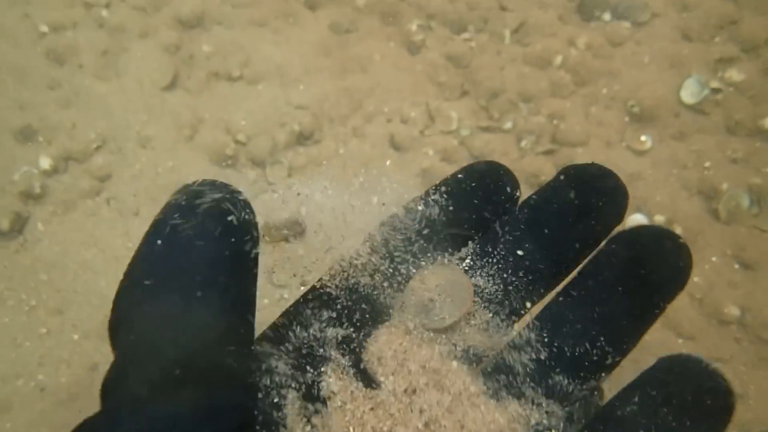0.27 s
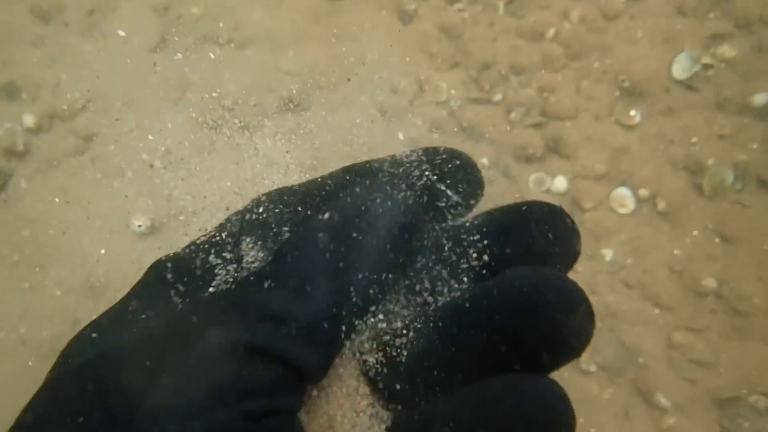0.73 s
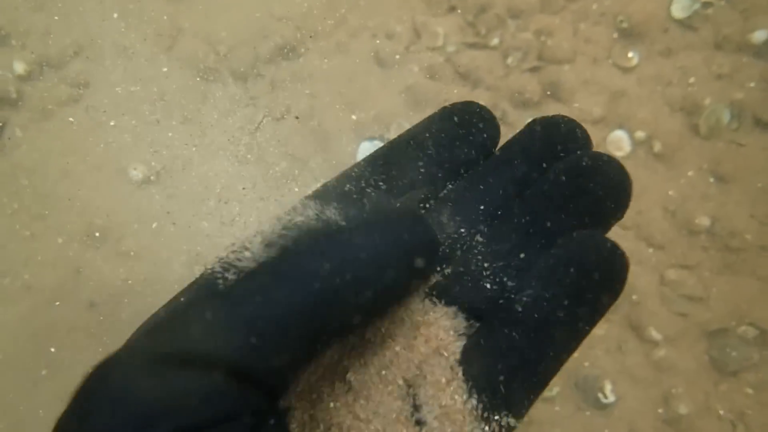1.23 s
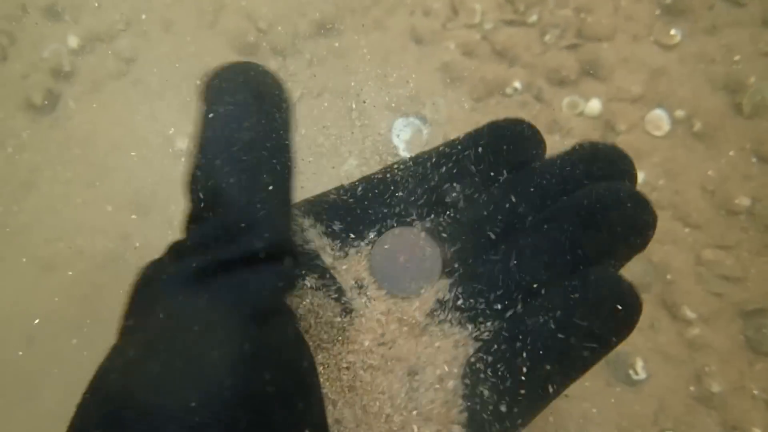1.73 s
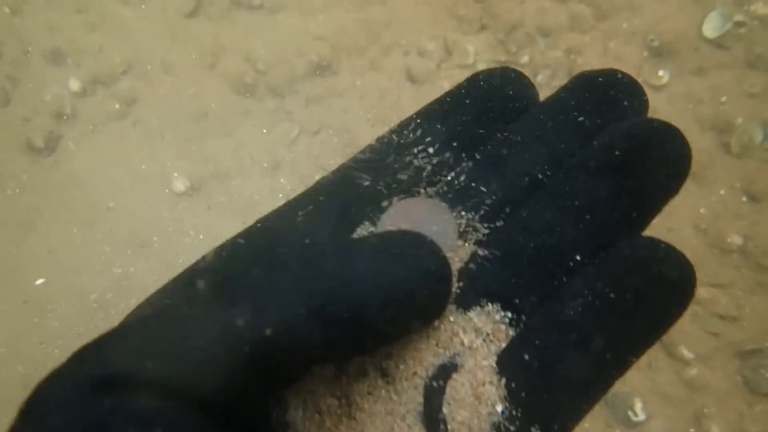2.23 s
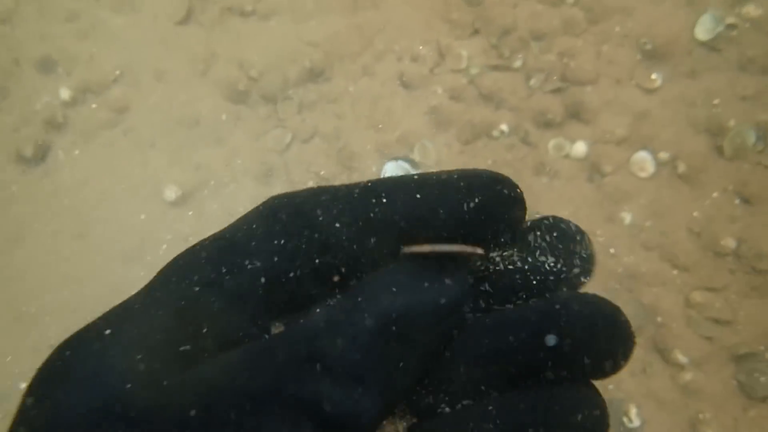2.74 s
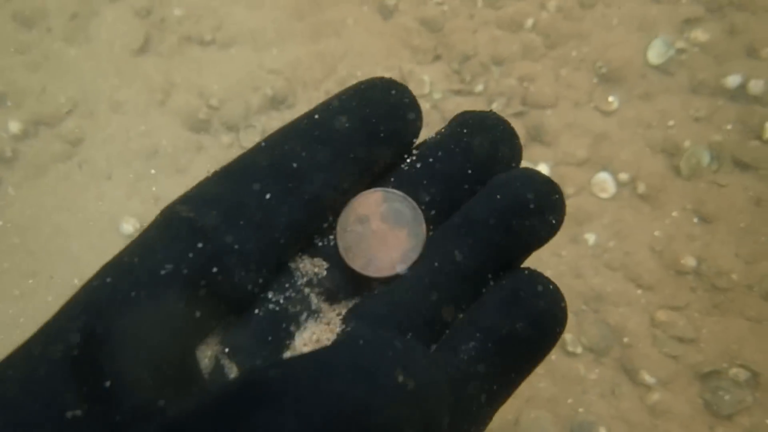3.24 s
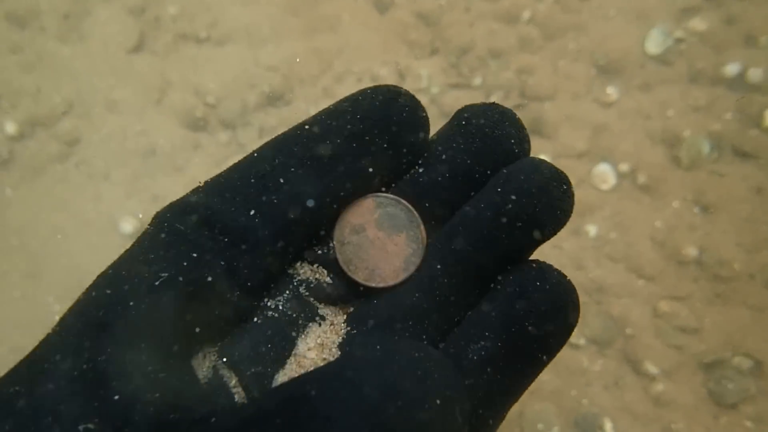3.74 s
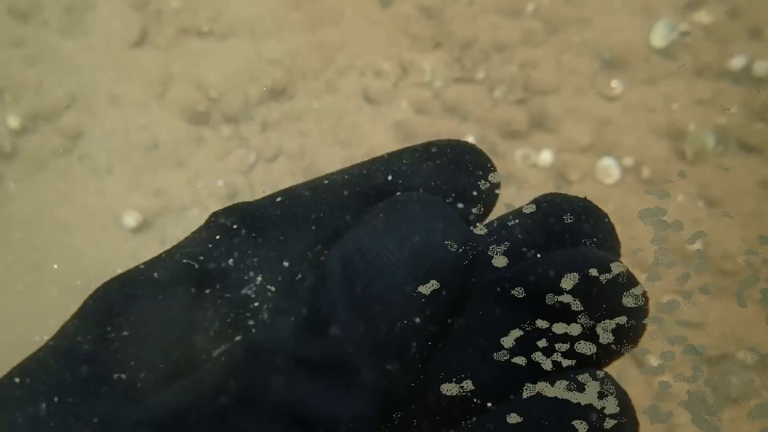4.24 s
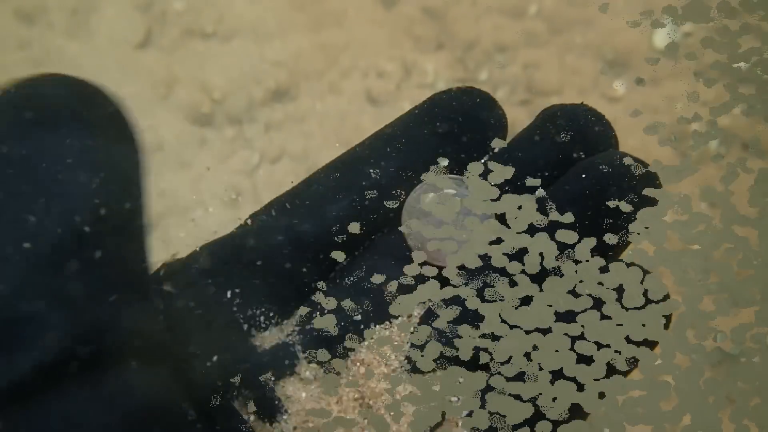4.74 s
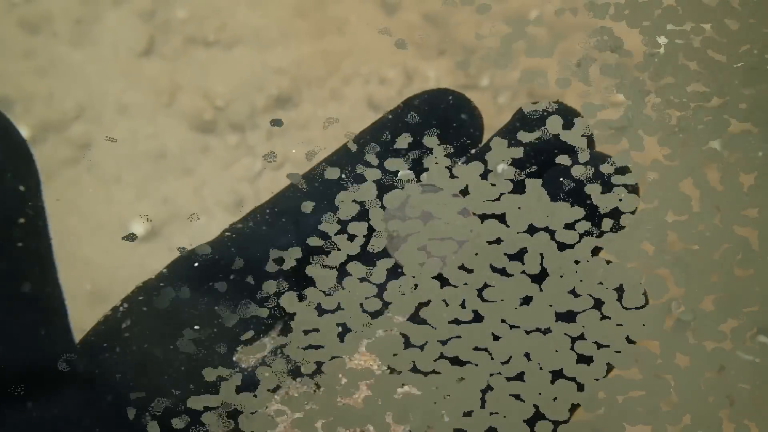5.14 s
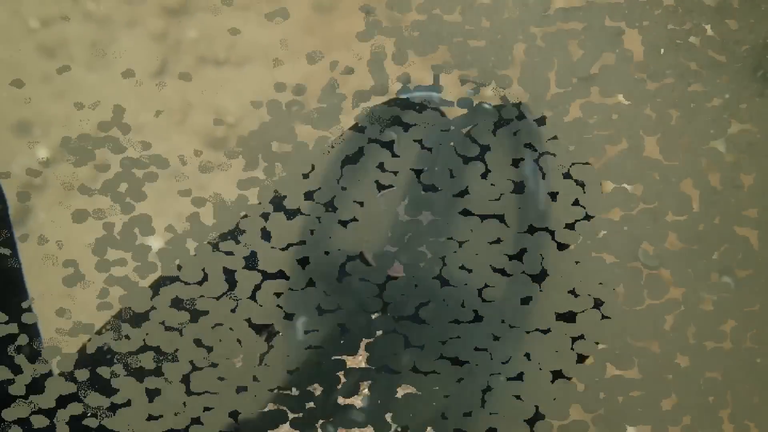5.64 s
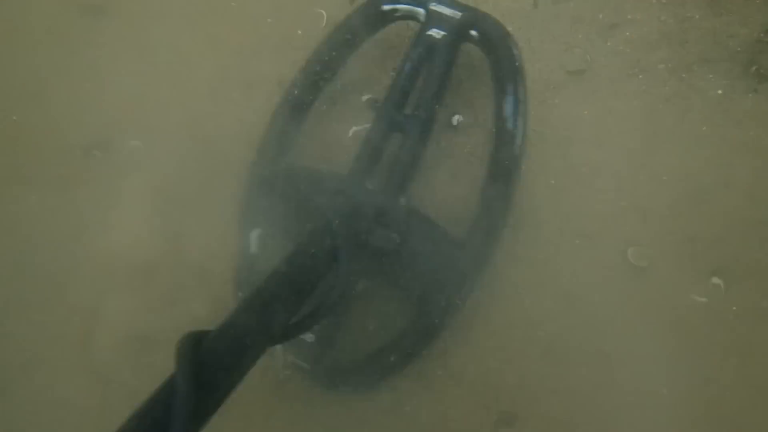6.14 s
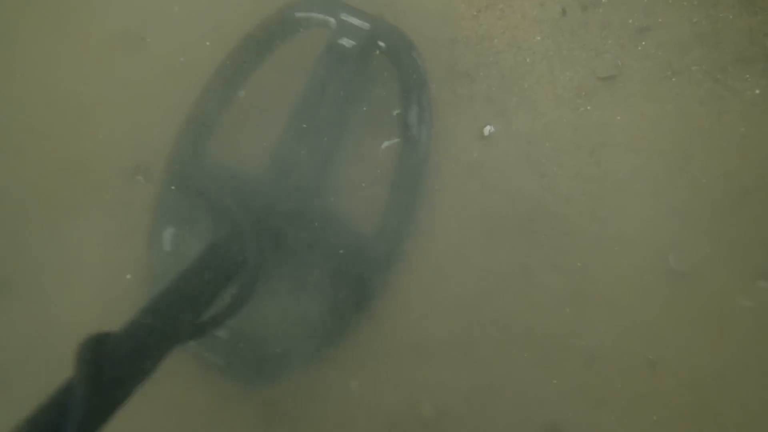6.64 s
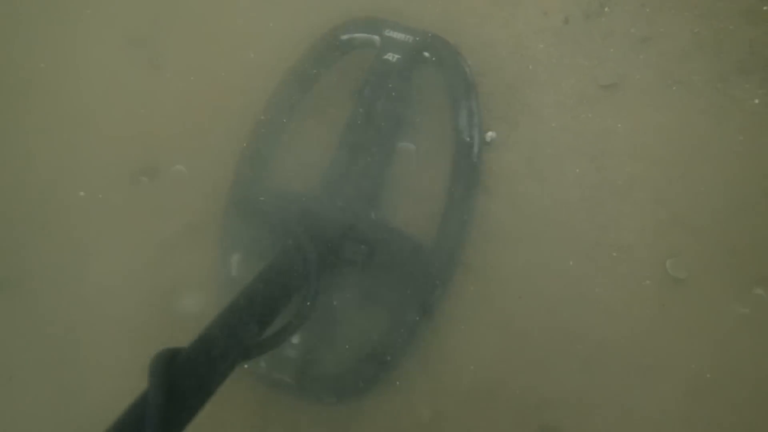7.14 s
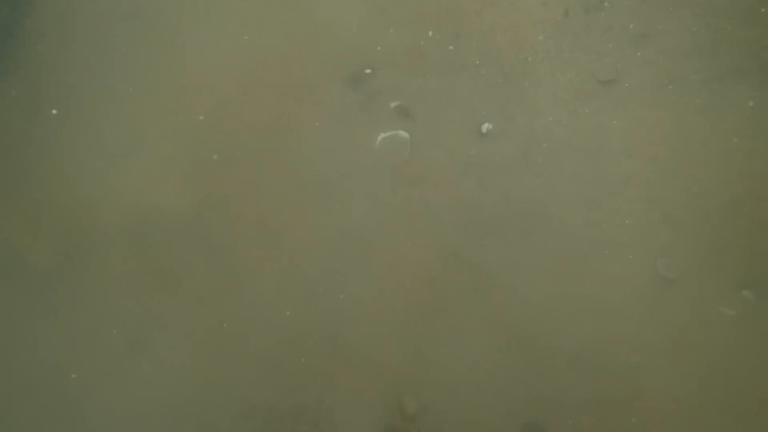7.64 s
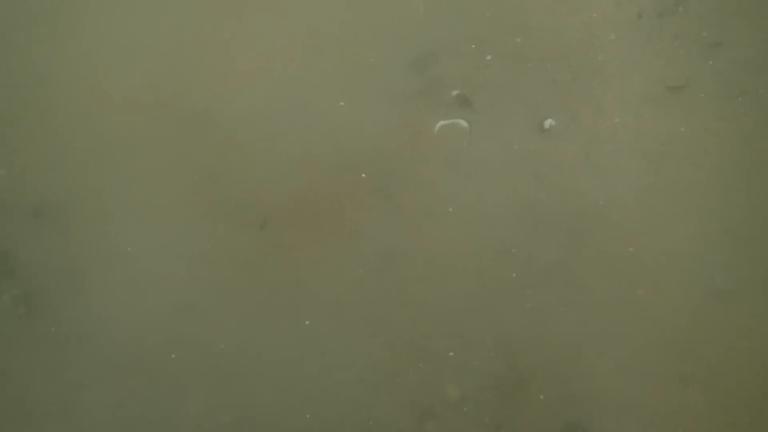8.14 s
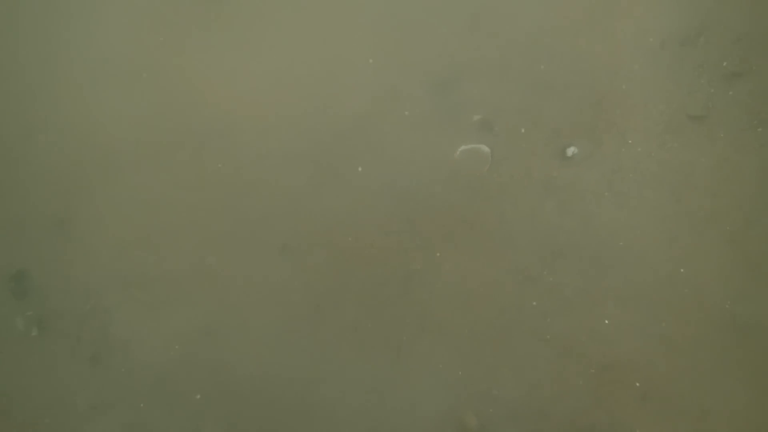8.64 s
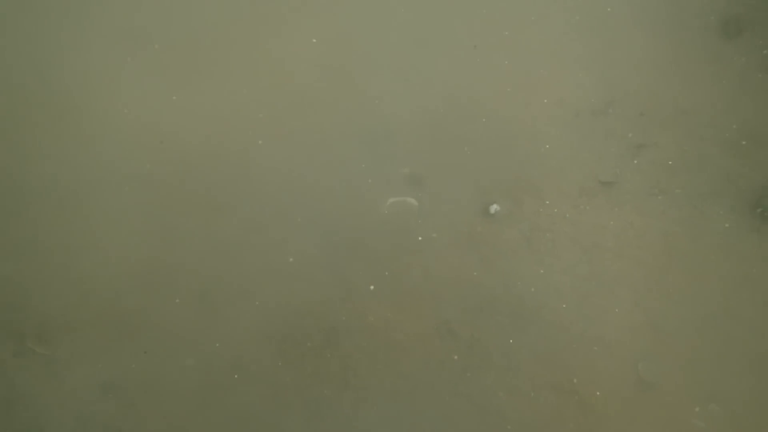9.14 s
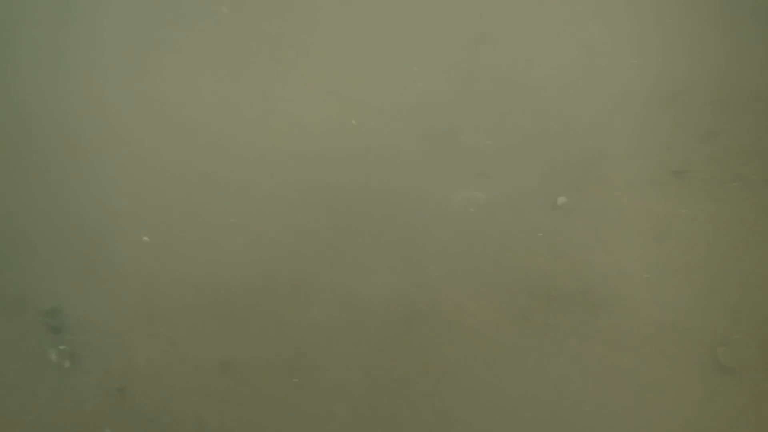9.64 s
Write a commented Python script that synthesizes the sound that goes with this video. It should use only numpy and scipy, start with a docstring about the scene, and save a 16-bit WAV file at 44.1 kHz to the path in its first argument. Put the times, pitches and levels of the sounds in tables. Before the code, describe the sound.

Close and muffled inside a sealed underwater camera housing, a gloved hand rubs sand off a coin: short gritty rasps, clicks and dull hollow knocks over a rough electronic purr. A lull follows around three seconds, then a few hard buzzing snaps and thumps. As the diver moves on, low watery wash and thin regular ticks take over, ending in bubbly sand scrapes and clustered knocks.

```python
"""A gloved hand rubs sand off a coin beside a sealed underwater camera, then the diver moves on over the bed.
Sand rasps as shaped random grains, coarse grains crunch, grit clicks, and the housing knocks as a damped resonator.
Bubbles ring as short rising tones; river noise rumbles and hollow rings gurgle round the housing.
Electronics purr in bursts repeated every picture, later with thin ticks, over a faint filtered hiss.
A peak limiter lowers the whole sound on hard knocks."""
import sys
import numpy as np
from scipy import signal
from scipy.fft import rfft, irfft, next_fast_len
from scipy.io import wavfile
from scipy.ndimage import uniform_filter1d, minimum_filter1d, map_coordinates

SR = 44100
rng = np.random.default_rng(int(sys.argv[2]) if len(sys.argv) > 2 else 0)


def wav_record(signal):
    """Record a signal, one row per channel, as 16-bit PCM in the file named by sys.argv[1]."""
    frames = np.transpose(np.atleast_2d(signal))
    bounded = np.clip(frames, -1, 1)
    # unit amplitude maps onto the largest positive 16-bit level
    quanta = np.round(bounded * 32767).astype(np.int16)
    wavfile.write(sys.argv[1], SR, quanta)


N = 436149
TIME = np.arange(N) / SR
RING = np.arange(SR // 10) / SR  # time axis of one short sound
PICTURE_S = 1001 / 15000  # the camera's picture period


def amp(db):
    """Logarithmic level: decibels to linear gain."""
    return 10 ** (np.asarray(db) / 20)


def unit(x):
    """Normalisation of mean power: scale to rms 1."""
    return x / np.sqrt(np.mean(x ** 2) + 1e-20)


def curves(rows, at=TIME):
    """Linear interpolation in time of each column after the first."""
    s, *columns = np.transpose(rows)
    return [np.interp(at, s, column) for column in columns]


def wobble(rate, size=N):
    """Band-limited random modulation: a smooth curve through rate random knots a second."""
    position = np.arange(size) * rate / SR
    steps = np.arange(0, position[-1] + 1, 1 / 8)
    knots = rng.standard_normal(int(position[-1]) + 4)
    return np.interp(position, steps, map_coordinates(knots, [steps]))


def response(points, size=16384):
    """Minimum phase: the causal impulse response with the gain of (Hz, dB) points."""
    f, db = np.transpose(points)
    log_f = np.log(np.fft.rfftfreq(size, 1 / SR) + 1)
    cepstrum = irfft(np.log(amp(np.interp(log_f, np.log(f), db))))
    # folding the cepstrum forward in time makes the response causal
    cepstrum[1:size // 2] *= 2
    cepstrum[size // 2 + 1:] = 0
    return irfft(np.exp(rfft(cepstrum)))


def colour(x, points):
    """Linear filtering: shape each channel with a spectrum."""
    return signal.oaconvolve(x, response(points)[None], axes=1)[:, :N]


def struck(impulses, points):
    """Impulse excitation: each impulse becomes a click of the same peak with the given spectrum."""
    click = response(points)
    return signal.oaconvolve(impulses, click / np.abs(click).max())[:N]


def add(track, s, sound):
    """Superposition: mix a sound in at time s."""
    i = int(round(s * SR))
    if 0 <= i < N:
        track[..., i:i + sound.shape[-1]] += sound[..., :N - i]


def pan(left_db):
    """Level difference between ears: gains of the two microphones, left_db apart."""
    return amp([[left_db / 2], [-left_db / 2]])


def spread(mid, side, side_db):
    """Partial coherence: a stereo pair of rms 1 from two unrelated signals."""
    return unit(unit(mid) + amp(side_db) * unit(side) * np.array([[1], [-1]]))


def grit(rate, scatter_db):
    """Shot noise: random impulses of uneven size, on average rate a second."""
    size = amp(scatter_db * np.clip(rng.standard_normal(N), -2, 2))
    hits = rng.random(N) < rate / SR
    return unit(hits * rng.uniform(-1.13, 1, N) * size)


def blips(rate, pitch_hz, octaves, cycles, scatter_db):
    """Damped oscillation: a stream of short rings at scattered pitches."""
    count = int(rate * N / SR)
    start, pitch, size, sign = np.clip(rng.standard_normal((count, 4)), -2, 2).T
    start = np.abs((np.arange(count) + start) * SR / rate).astype(int)
    t = RING[:len(RING) // 2]
    turns = pitch_hz * 2 ** (octaves * pitch[:, None]) * t
    gain = (np.sign(sign) * amp(scatter_db * size))[:, None]
    envelope = (1 - np.exp(-2 * turns)) * np.exp(-turns / cycles)
    rings = gain * np.sin(2 * np.pi * turns) * envelope
    places = start[:, None] + np.arange(len(t))
    return unit(np.bincount(places.ravel(), rings.ravel(), N)[:N])


def swell(start, end, rise, fall, db, at=TIME):
    """Exponential onset and decay: holds start to end, 20 dB down a rise before and a fall after."""
    outside = np.maximum(start - at, 0) / rise + np.maximum(at - end, 0) / fall
    return amp(db - 20 * np.minimum(outside, 10))


def swells(rows):
    """Energy summation: the joint gain of (crest s, rise s, fall s, dB) swells, added in power."""
    coarse = np.linspace(0, N / SR, 4000)
    power = sum(swell(s, s, rise, fall, db, coarse) ** 2 for s, rise, fall, db in rows)
    return np.interp(TIME, coarse, np.sqrt(power))


# strokes that rub sand in the glove or stir it on the bed: crest_s [s], rise_s [s], fall_s [s], level_db [dB]
SAND_STROKES = [(.065, 0.17, 0.11, -36.5), (.65, 0.11, 0.11, -33.5), (.855, 0.12, 0.13, -34.5),
                (1.385, 0.075, 0.23, -43), (1.53, 0.22, 0.11, -43), (1.615, 0.064, 0.05, -25.5),
                (1.725, 0.079, 0.052, -42.5), (2.46, 0.18, 0.44, -49.5), (2.6, 0.27, 0.24, -46.5),
                (4.13, 0.067, 0.021, -47), (4.275, 0.064, 0.058, -40.5), (4.46, 0.13, 0.13, -46.5),
                (4.77, 0.025, 0.071, -45), (5.95, 0.23, 0.16, -50.5), (7.04, 0.028, 0.048, -42.5),
                (7.115, 0.15, 0.075, -44.5), (7.3, 0.024, 0.04, -37.5), (7.985, 0.077, 0.28, -37),
                (8.2, 0.091, 0.11, -48), (8.35, 0.036, 0.16, -43), (8.51, 0.07, 0.11, -39),
                (8.68, 0.042, 0.06, -43.5), (8.89, 0.11, .09, -49), (9.39, 0.11, 0.057, -44.5),
                (9.67, 0.38, 0.54, -46)]
# spectrum of the rasping grains: frequency_hz [Hz], level_db [dB per Hz]
RASP_SPECTRUM = [(500, -23.5), (900, 22.5), (1300, 15), (1650, 16), (1950, 2), (2400, -0.5), (3100, -8),
                 (3700, -23.5), (6000, -34), (9000, -48.5), (14000, -56)]
# fine sand pouring: centre_s [s], length_s [s, Gaussian width], level_db [dB]
SAND_POURS = [(0.647, 0.032, -48), (0.863, 0.034, -59.5), (1.61, 0.017, -61), (5.92, 0.056, -56),
              (6.655, 0.02, -62), (7.033, 0.027, -56.5), (7.3, 0.015, -52.5), (9.37, 0.03, -56.5)]
# spectrum of fine sand: frequency_hz [Hz], level_db [dB per Hz]
FINE_SAND_SPECTRUM = [(1200, -17), (2200, 7), (3100, 3), (4000, -6), (5500, 5.5), (6800, 2), (8500, -4),
                      (12000, -30)]
DRIFT_DB = -59  # sand that drifts between the strokes
FROTH_DB = -1  # tiny bubbles against the grains, at full froth


def sand():
    """Granular friction: grains rasp under glove and search coil, the stirred bed froths, fine sand fizzes."""
    frothing = np.interp(TIME, [7.4, 7.9, 9, 9.5], [0, 0.91, 0.88, 0.39])
    grains = colour(np.array([grit(2200, 2.2) for _ in range(2)]), RASP_SPECTRUM)
    grains = spread(*grains, side_db=-7) * pan(4.3)
    froth = [blips(rate=450, pitch_hz=1250, octaves=0.3, cycles=6, scatter_db=9) for _ in range(2)]
    froth = spread(*froth, side_db=-3)
    rubbing = np.hypot(amp(DRIFT_DB), swells(SAND_STROKES)) * amp(1.9 * wobble(45))
    rasp = rubbing * (grains + frothing * amp(FROTH_DB) * froth)
    pouring = sum(amp(db) * np.exp(-.5 * ((TIME - s) / length) ** 2) for s, length, db in SAND_POURS)
    fine = colour(np.array([grit(2900, 3.3) for _ in range(2)]), FINE_SAND_SPECTRUM)
    return rasp + pouring * spread(*fine, side_db=-0.5)


# coarse grains catching under the glove or the search coil: start_s [s], level_db [dB]
GRAIN_CATCHES = [(.758, -45), (0.811, -44), (1.474, -41), (1.515, -33), (1.566, -36), (1.608, -27),
                 (2.591, -39), (2.611, -33), (4.272, -40), (4.286, -41), (7.034, -24.5), (7.115, -37),
                 (7.288, -32), (7.302, -33), (9.396, -33), (9.404, -29), (9.724, -12), (9.734, -21)]
# spectrum of their crunch: frequency_hz [Hz], level_db [dB]
CRUNCH_SPECTRUM = [(500, -22), (950, -0.5), (1550, 2), (2000, -11), (3100, -26), (3800, -36), (9000, -54)]


def catches():
    """Stick-slip: a coarse grain sticks under the glove or the coil and lets go with a brief crunch."""
    crunch = np.zeros(N)
    for s, db in GRAIN_CATCHES:
        tail = 0.17 * rng.standard_normal(len(RING)) * amp(-60 * RING / 0.017)
        add(crunch, s, amp(db) * ((RING == 0) + tail))
    return struck(crunch, CRUNCH_SPECTRUM) * pan(2.8)


# coin, shell and grit clicks: start_s [s], level_db [dB], pitch_hz [Hz]
HARD_CLICKS = [(.859, -19, 7000), (0.866, -31, 7160), (0.92, -16, 2460), (0.92, -22, 6940),
               (1.149, -41, 2730), (2.606, -37.5, 2970), (2.772, -25.5, 2610), (2.771, -29, 7180),
               (6.275, -36.5, 6230), (6.314, -29.5, 1980), (7.032, -29.5, 5850), (8.58, -34.5, 5900),
               (9.767, -27, 6350), (9.774, -28.5, 5160)]


def clicks():
    """Impact of hard bodies: small bits touch with a very short ring of irregular phase."""
    out = np.zeros((2, N))
    for s, db, hz in HARD_CLICKS:
        roughness = 0.66 * np.array([wobble(2500, size=len(RING)) for _ in range(2)])
        phase = 2 * np.pi * hz * RING + roughness
        add(out, s, amp(db - 60 * RING / 0.0078) * np.sin(phase))
    return out


# knocks on the housing, levels before onset and panning:
# start_s [s], level_db [dB], pitch_hz [Hz], t60_s [s], contact_db [dB against the knock]
HOUSING_KNOCKS = [(0.048, -15.5, 264, 0.082, -26), (0.572, -14, 427, 0.027, -28),
                  (.665, -12.5, 472, 0.027, -18), (.697, -10.5, 390, 0.025, -20),
                  (.826, -11, 353, 0.055, -21.5), (0.865, -7, 272, 0.045, -12),
                  (.876, -1.5, 372, 0.022, -16.5), (0.893, -6, 328, 0.027, -33),
                  (.916, 2.5, 387, 0.028, -19), (1.015, -6, 336, 0.013, -38),
                  (1.15, -16.5, 438, 0.021, -13), (1.164, -2.5, 127, 0.016, -44),
                  (1.177, -8, 392, 0.035, -49), (1.23, -12, 109, 0.04, -49), (1.332, -10, 123, 0.032, -39),
                  (1.587, -1.5, 375, 0.039, -14), (1.608, -1, 385, 0.049, -26), (1.622, 4, 343, 0.031, -31),
                  (1.633, -3.5, 320, 0.037, -25.5), (1.664, -7, 344, 0.038, -45),
                  (1.721, -2.5, 258, 0.021, -47), (1.818, -6.5, 411, 0.049, -55),
                  (2.603, -11.5, 368.4, 0.063, -25), (2.763, -14, 248, 0.038, -40),
                  (2.772, 2, 218, 0.019, -24), (2.799, -10.5, 404, 0.054, -40),
                  (2.831, -7.5, 370, 0.028, -50), (4.146, 6.5, 182.4, 0.014, -37),
                  (4.2, -10, 111.5, 0.029, -40), (4.447, -6, 343, 0.022, -28),
                  (4.455, -6.5, 65, 0.035, -43), (4.648, -9.5, 406, 0.035, -45),
                  (7.033, -6, 304, 0.051, -30), (7.127, -12, 310, 0.067, -35),
                  (7.315, -7.5, 192, 0.065, -28), (7.996, 3, 338, 0.046, -16), (8.02, 0.5, 338, 0.061, -35),
                  (8.046, -0.5, 410, 0.036, -41.5), (8.072, -13, 454, 0.13, -39),
                  (8.106, -5, 295, 0.046, -29), (8.138, -12, 536, 0.066, -28),
                  (8.323, -13.5, 328, 0.035, -29), (8.201, -0.5, 483, 0.036, -25),
                  (8.365, 6.5, 289, 0.038, -15.5), (8.389, 7, 365, 0.017, -33),
                  (8.778, -1, 368, 0.03, -26.5), (8.812, 3.5, 135, 0.024, -40),
                  (8.906, -11, 305, 0.064, -39), (9.195, -6, 364, 0.044, -54), (9.268, -1, 349, 0.026, -60),
                  (9.435, -7, 420, 0.024, -43), (9.559, -9.5, 313, 0.05, -43), (9.723, 0, 387, 0.037, -14),
                  (9.734, -2, 330, 0.052, -36.5), (9.767, -0.5, 426, 0.019, -21.5),
                  (9.775, -2.5, 332, 0.023, -20), (9.798, 3.5, 472, 0.071, -10)]
# spectrum of the contact scuff: frequency_hz [Hz], level_db [dB]
CONTACT_SPECTRUM = [(200, -20), (600, 21), (1400, 4), (1900, -3.5), (2300, -3.5), (2650, -11.5), (3100, -8),
                    (3900, -18.5), (6000, -22.5), (9000, -28), (14000, -30)]


def knocks():
    """Damped resonance: each blow scuffs the shell and rings the water-damped housing for a few cycles."""
    thuds, contacts = np.zeros((2, N)), np.zeros(N)
    for s, db, hz, t60, contact_db in HOUSING_KNOCKS:
        # a soft contact starts more gently
        onset = 1 - np.exp(-RING / np.interp(contact_db, [-50, -36], [.003, .001]))
        ring = np.sin(2 * np.pi * hz * RING) * amp(-60 * RING / t60)
        # the whole case shifts in the water
        push = 1.73 * np.sin(2 * np.pi * 85 * RING) * amp(-60 * RING / 0.007)
        lean_db = 5 * min(hz / 330, 1)  # higher rings lean further to the left microphone
        add(thuds, s, amp(db) * onset * (ring * pan(lean_db) + rng.choice([-1, 1]) * push))
        scuff = (RING == 0) + 0.28 * rng.standard_normal(len(RING)) * amp(-60 * RING / 0.015)
        add(contacts, s + 0.00077, amp(db + contact_db) * scuff)
    return thuds + struck(contacts, CONTACT_SPECTRUM) * pan(0.81)


# single bubbles, levels before onset and panning: start_s [s], level_db [dB], pitch_hz [Hz]
SINGLE_BUBBLES = [(4.764, -34, 1250), (4.782, -33, 1070), (5.073, -34, 1420), (5.608, -18.5, 670),
                  (7.969, -25.5, 1430), (7.978, -19, 885), (8.066, -14, 995), (8.241, -20.5, 940),
                  (8.537, -38.5, 3200), (8.658, -26, 1370), (8.94, -33, 1640), (9.397, -23.5, 1360),
                  (9.731, -19, 1360), (9.773, -35, 3070), (9.821, -21, 1480), (9.832, -39, 2960)]
SPLASH_DB, SPLASH_T60_S = -27.5, 0.052  # the splash round a bubble, against its ring


def bubbles():
    """Volume pulsation: a freed bubble splashes faintly and rings unsteadily, its pitch creeping up."""
    rings, splash = np.zeros((2, N))
    for s, db, hz in SINGLE_BUBBLES:
        phase = 2 * np.pi * hz * RING * (1 + 0.28 * RING) + 0.53 * wobble(350, size=len(RING))
        onset = 1 - np.exp(-RING / 0.00087)
        add(rings, s, amp(db - 60 * RING / 0.034) * onset * np.sin(phase))
        add(splash, s, amp(db + SPLASH_DB - 60 * RING / SPLASH_T60_S))
    noise = unit(colour(rng.standard_normal((1, N)), RASP_SPECTRUM))[0]
    return (rings + splash * noise) * pan(6.2)


# steady current past the housing, stronger once the diver moves on: time_s [s], level_db [dB before CURRENT_DB]
CURRENT_LEVELS = [(0.0, -59), (4.0, -61.5), (5.4, -51.5), (7.22, -43), (7.52, -46.5), (9.59, -47),
                  (9.89, -54)]
# surges pushed at the housing by each move of hand or body:
# crest_s [s], rise_s [s], fall_s [s], rumble_db [dB], gurgle_db [dB]
WATER_SURGES = [(.06, 0.1, 0.11, -24.5, -24.5), (.2, 0.064, 0.071, -31.5, -27.5),
                (0.559, 0.13, 0.66, -26.5, -26), (0.666, 0.063, 0.097, -31, -22.5),
                (0.885, 0.11, 0.048, -30.5, -17.5), (1.46, 0.19, 0.077, -34.5, -29.5),
                (1.62, 0.095, 0.15, -21, -18.5), (2.549, 0.27, 0.25, -30.5, -30),
                (2.869, 0.22, 0.15, -33.5, -29), (3.468, 0.076, 0.3, -66, -37),
                (4.28, 0.052, 0.047, -26.5, -30.5), (4.65, 0.22, 0.16, -31.5, -32),
                (5.45, 0.5, 1, -37.5, -37.5), (5.98, 0.33, 0.31, -30, -34), (7.06, 0.093, 0.34, -32.5, -32),
                (7.31, 0.11, 0.22, -26.5, -26.5), (8.1, 0.2, 0.16, -27.5, -22.5),
                (8.34, 0.054, 0.12, -34, -24.5), (9.22, 0.74, 0.21, -27, -27.5),
                (9.4, 0.14, 0.086, -22, -23.5), (9.66, 0.17, 0.19, -28.5, -26.5)]
# broad wash as the diver gets under way: time_s [s], level_db [dB]
WASH_LEVELS = [(0, -54), (3.3, -59.5), (4.3, -48), (5.9, -33.5), (6.7, -34.5), (7.8, -32), (8.1, -25),
               (8.7, -28.5), (9.5, -29.5), (9.89, -22)]
# spectra of eddies, wash and the river's deep swell: frequency_hz [Hz], level_db [dB per Hz]
RUMBLE_SPECTRUM = [(15, -32), (28, -4), (42, -11.5), (70, -3), (120, -1.5), (200, -5), (280, -8.5),
                   (450, -34.5), (900, -62.5)]
WASH_SPECTRUM = [(70, -30), (150, 1.5), (330, 8.5), (520, 1.5), (700, -9), (900, -25.5), (1250, -27.5),
                 (1800, -46), (3000, -54)]
DEEP_SPECTRUM = [(15, -35), (30, -1.5), (45, 2), (75, -0.5), (110, -9), (170, -10.5), (300, -35),
                 (600, -64.5)]
CURRENT_DB, DEEP_DB = 12, -44.5  # rumble over the current table; mean level of the deep swell
CALM_GURGLE_DB, GURGLE_GROWS = -45, 0.31  # gurgle in calm water, and its dB per dB of current


def water():
    """Flow noise: current and surges buffet the housing and set its hollow ringing; moving on adds a wash."""
    current_db, = curves(CURRENT_LEVELS)
    rumble_rows = [(s, rise, fall, db) for s, rise, fall, db, _ in WATER_SURGES]
    gurgle_rows = [(s, rise, fall, db) for s, rise, fall, _, db in WATER_SURGES]
    push = np.hypot(amp(current_db + CURRENT_DB), swells(rumble_rows))
    calm_db = CALM_GURGLE_DB + GURGLE_GROWS * (current_db - current_db.min())
    slosh = np.hypot(amp(calm_db), swells(gurgle_rows))

    eddies = colour(np.array([grit(500, 3.2) for _ in range(2)]), RUMBLE_SPECTRUM)
    eddies = spread(*eddies, side_db=-13.5)
    deep = spread(*colour(rng.standard_normal((2, N)), DEEP_SPECTRUM), side_db=-8)
    deep = amp(DEEP_DB + 2.7 * wobble(6)) * deep
    rumble = deep + push * amp(2.16 * wobble(20)) * eddies * pan(0.4)

    hollow = [blips(rate=110, pitch_hz=365.2, octaves=0.21, cycles=2.07, scatter_db=1.5) for _ in range(2)]
    hollow = colour(np.array(hollow), [(130, -16.0), (240, -6.5), (330, -1.0),
                                       (480, -0.5), (800, -13.0), (1600, -23.0)])
    gurgle = slosh * spread(*hollow, side_db=-9.5) * pan(7.9)

    wash = colour(np.array([grit(700, 2.9) for _ in range(2)]), WASH_SPECTRUM)
    wash = spread(*wash, side_db=-16.5) * pan(-.5)
    return rumble + gurgle + amp(curves(WASH_LEVELS)[0] + 3.1 * wobble(9.6)) * wash


# working states of the electronics, by name: start_s [s], end_s [s], rise_s [s], fall_s [s], level_db [dB]
STATE_SPELLS = {"busy": [(0, 4.53, .1, 2.4, -23)], "strained": [(3.53, 3.81, 0.17, 0.068, -11.5),
                (5.0, 5.08, 0.25, 0.49, -19)], "idle": [(5.55, 8.2, 0.46, 9.6, -21.5),
                (7.15, 7.9, 0.086, 0.16, -32.5)]}


def holding(state, at=TIME):
    """Amplitude envelope: the strength of a working state of the electronics."""
    return sum(swell(*spell, at) for spell in STATE_SPELLS[state])


# spectrum of the case's thump: frequency_hz [Hz], level_db [dB]
CASE_SPECTRUM = [(120, -38), (330, -18.5), (480, 10), (590, 15), (710, 5.5), (850, -17), (1020, -9.5),
                 (1160, -24.5), (1320, -14.5), (1800, -42), (3000, -65), (6000, -90)]
# modes the case rings with after a kick: pitch_hz [Hz], level_db [dB against the kick], t60_s [s]
RINGING_MODES = [(590, -18.5, 0.17), (705, -16, 0.099), (821.5, -21, 0.12), (990, -33, 0.25),
                 (1138, -32, 0.19)]
CASE_ATTACK_S = 0.00082  # the case's ring takes a moment to build


def kicked(kicks):
    """Modal excitation: a kick thumps the case and leaves its narrow modes ringing."""
    t = np.arange(SR // 4) / SR
    ring = sum(amp(db - 60 * t / t60) * np.sin(2 * np.pi * hz * t) for hz, db, t60 in RINGING_MODES)
    ring = ring * (1 - np.exp(-t / CASE_ATTACK_S))
    return struck(kicks, CASE_SPECTRUM) + signal.oaconvolve(kicks, ring)[:N]


# hard snaps inside the case, in two short runs about a picture apart: start_s [s], level_db [dB]
CASE_SNAPS = [(3.867, -17), (3.934, -18.5), (4.002, -16), (4.069, -21), (4.135, -13.5), (4.201, -15),
              (5.003, -27), (5.07, -24)]
SNAP_HZ, SNAP_T60_S, SNAP_RING_DB = 665.5, 0.12, -1.5  # the short ring, its level against the snap


def snaps():
    """Impulse response: for two short spells, once a picture, a hard kick rings the case with a decaying tone."""
    kicks, rings = np.zeros((2, N))
    tone = (1 - np.exp(-RING / CASE_ATTACK_S)) * np.sin(2 * np.pi * SNAP_HZ * RING)
    for s, db in CASE_SNAPS:
        add(kicks, s, np.array([amp(db)]))
        add(rings, s, amp(db + SNAP_RING_DB - 60 * RING / SNAP_T60_S) * tone)
    return rings + kicked(kicks)


BURST_ATTACK_S, SINK_S = 0.0047, 0.0018  # time constants of a burst's swell and of its sinking pitch
DRIFT_S = .15  # the bursts change slowly, over about this long
FLUTTER_DB, FLUTTER_RATE = 2.26, 170  # the tones are rough: depth, and random knots a second


def bursts(pattern, state, jitter_s, detune, scatter_db, sink):
    """Periodic excitation: drifting bursts recur every picture; kicks ring the case, tones sink in pitch."""
    tones, kicks = np.zeros((2, N))
    starts, t = np.arange(0, N / SR, PICTURE_S), RING[:len(RING) // 2]
    sinking = t + sink * SINK_S * (1 - np.exp(-t / SINK_S))  # the tone begins above its pitch
    strength = holding(state, starts)
    for delay, db, hz, length, kick_db in pattern:
        shape = amp(db) * (1 - np.exp(-t / BURST_ATTACK_S)) * np.exp(-(t / length) ** 4)
        drifts = [map_coordinates(knots, [starts / DRIFT_S], mode="mirror")
                  for knots in rng.standard_normal((3, len(starts)))]
        for s, gain, late, off, size in zip(starts + delay, strength, *drifts):
            s, gain = s + jitter_s * late, gain * amp(scatter_db * size)
            add(tones, s, gain * shape * np.sin(2 * np.pi * hz * (1 + detune * off) * sinking))
            add(kicks, s, np.array([gain * amp(kick_db)]))
    return tones * amp(FLUTTER_DB * wobble(FLUTTER_RATE)) + kicked(kicks)


# bursts within one picture, for each working state, levels against the state's strength and before the
# tone's envelope: delay_s [s], level_db [dB], pitch_hz [Hz], length_s [s], kick_db [dB]
BUSY_BURSTS = [(-.0034, 2.5, 733, 0.0065, -5), (.005, -1, 700, 0.017, -22), (.013, -6, 590, 0.032, -15),
               (.03, -5.5, 760, 0.0038, -8), (.0335, 10.5, 630, 0.0059, -11), (.041, -6.5, 705, 0.028, -13),
               (.04, -7.5, 570, 0.0078, -30)]
STRAINED_BURSTS = [(-.003, -10, 748, 0.019, -17), (.001, 1, 583, 0.017, -15),
                   (.002, -25.5, 1160, 0.012, -41), (.003, -17, 862, .016, -29),
                   (.031, -7, 693, 0.0089, -19)]
IDLE_BURSTS = [(.002, -8.5, 615.5, 0.0044, -9.5), (.0222, 0, 560, 0.0043, 1.5)]
# the case's narrow resonances, droning on between bursts: frequency_hz [Hz], level_db [dB per Hz]
DRONE_SPECTRUM = [(380, -25.5), (430, -7), (520, -19), (552, -3), (590, -0.5), (620, -8), (690, 4.5),
                  (722, 0.5), (760, -17.5), (825, 3.5), (890, -24), (960, -25.5), (990, -5), (1035, -25),
                  (1085, -27), (1140, -5), (1230, -44), (3000, -65)]
# the hollow side of the case, droning at the left microphone: frequency_hz [Hz], level_db [dB per Hz]
HOLLOW_SPECTRUM = [(200, -34), (310, -14.5), (350, -7.5), (425, 8), (490, -6.5), (525, -15), (560, -4.5),
                   (620, -23), (1200, -54.5)]
DRONE_DB = -18  # against the busy state's strength


def electronics():
    """Periodic pulse train: a purr at the picture rate near the right microphone, a lower hum at the left."""
    busy = holding("busy")
    drone = busy * amp(DRONE_DB) * unit(colour(rng.standard_normal((1, N)), DRONE_SPECTRUM))[0]
    busy_bursts = bursts(BUSY_BURSTS, "busy", jitter_s=0.00018, detune=0.012, scatter_db=2.2, sink=.33)
    idle_bursts = bursts(IDLE_BURSTS, "idle", jitter_s=0.00034, detune=0.058, scatter_db=1.5, sink=0.49)
    strain = bursts(STRAINED_BURSTS, "strained", jitter_s=0.00031, detune=0.014, scatter_db=1.7, sink=0.16)
    purr = drone + snaps() + busy_bursts + idle_bursts + strain
    # the left microphone hears the purr weaker and later
    far_side = np.interp(TIME - .00015, TIME, amp(-15.0) * purr)
    hum = amp(-19.5 + 1.4 * wobble(30)) * np.sin(2 * np.pi * 341 * TIME + 0.23 * wobble(12))
    hollow = amp(-21.5) * unit(colour(rng.standard_normal((1, N)), HOLLOW_SPECTRUM))[0]
    hollow_strength = busy + amp(-11.5) * holding("strained")
    return np.array([far_side, purr]) + busy * hum * pan(8.3) + hollow_strength * hollow * pan(16.4)


# level of the ticks, inaudible at first: time_s [s], level_db [dB]
TICK_LEVELS = [(5.301, -80), (5.4, -38.5), (6.28, -41), (6.37, -49), (7.13, -47), (7.2, -35), (7.62, -35.5),
               (7.75, -38), (9.89, -39.5)]
# when single ticks come faint: time_s [s]
FAINT_TICK_TIMES = [5.606, 5.873, 5.94, 7.407, 7.674]
# spectrum of a tick: frequency_hz [Hz], level_db [dB]
TICK_SPECTRUM = [(700, -8), (1300, 20), (1900, -12.5), (2250, 13), (2700, -14), (3100, 0), (3700, -13.5),
                 (4500, 2), (5400, -2), (6400, 8.5), (7500, -25), (12000, -48)]
FAINT_DB, TICK_SCATTER_DB = -7, 1  # a faint tick against its neighbours; random spread of all ticks
# the tick's place in the picture, which slips steadily later from TICK_SLIP_FROM_S on [s, s, s per s]
TICK_DELAY_S, TICK_SLIP_FROM_S, TICK_SLIP_PER_S = 0.0018, 7.1, 0.0057


def ticking():
    """Periodic impulses: thin, dry ticks at the picture rate emerge after 5 s; a few are faint."""
    starts = np.arange(0, N / SR, PICTURE_S)
    delays = TICK_DELAY_S + TICK_SLIP_PER_S * np.maximum(starts - TICK_SLIP_FROM_S, 0)
    faint = np.abs(starts[:, None] - FAINT_TICK_TIMES).min(axis=1) < PICTURE_S / 2
    levels = curves(TICK_LEVELS, starts)[0] + FAINT_DB * faint
    ticks = np.zeros(N)
    for s, db in zip(starts + delays, levels):
        snap = (RING == 0) + 0.23 * rng.standard_normal(len(RING)) * amp(-60 * RING / 0.0024)
        add(ticks, s, amp(db + TICK_SCATTER_DB * rng.standard_normal()) * snap)
    return struck(ticks, TICK_SPECTRUM)


# spectrum of the microphone hiss: frequency_hz [Hz], level_db [dB per Hz]
HISS_SPECTRUM = [(1290, -44), (2200, 1.5), (2320, -19), (3220, -5), (3450, -24.5), (3700, -13.5),
                 (4120, -33), (4520, -11), (5320, -5.5), (6400, -4), (7960, 1), (9430, -6.5), (13100, -7.5),
                 (13700, -12.5), (14000, -7)]
# the hiss sags for a while: time_s [s], level_db [dB]
HISS_LEVELS = [(0, -57), (4.1, -56.5), (4.6, -58.5), (5.3, -59.5), (6.1, -56.5), (9.89, -57.5)]


def hiss():
    """Uncorrelated noise: each microphone has its own faint hiss."""
    return amp(curves(HISS_LEVELS)[0]) * unit(colour(rng.standard_normal((2, N)), HISS_SPECTRUM))


PORT_LAG_S = .00003  # sound reaches the right microphone a little later


def scene():
    """Superposition and travel time: all that reaches the microphones inside the housing."""
    left, right = (sand() + catches() + clicks() + knocks() + bubbles()
                   + water() + electronics() + ticking())
    m = next_fast_len(N + SR // 2)
    lag = np.exp(-2j * np.pi * np.fft.rfftfreq(m, 1 / SR) * PORT_LAG_S)
    late = irfft(rfft(right, m) * lag, m)[:N]
    return np.array([left, late]) + hiss()


def limiter(x, ceiling_db, release_db):
    """Dynamic compression: gain drops at once on a peak and recovers by release_db a second."""
    over = np.maximum(20 * np.log10(np.abs(x).max(0) + 1e-9) - ceiling_db, 0)
    cut = np.maximum.accumulate(over + release_db * TIME) - release_db * TIME
    return x * amp(uniform_filter1d(minimum_filter1d(-cut, size=45), size=45))


TOP_HZ = 13750  # the camera's band limit


def record(dry):
    """Band limitation: the camera cuts the deepest bass, limits peaks and keeps nothing above TOP_HZ."""
    m = next_fast_len(N + SR // 2)
    low_cut = signal.butter(2, 30, "highpass", fs=SR, output="sos")
    limited = limiter(signal.sosfilt(low_cut, dry), ceiling_db=-5.5, release_db=49.5)
    return irfft(rfft(limited, m) * (np.fft.rfftfreq(m, 1 / SR) < TOP_HZ), m)[:, :N]


dry = scene()
out = record(dry)
wav_record(out)
```